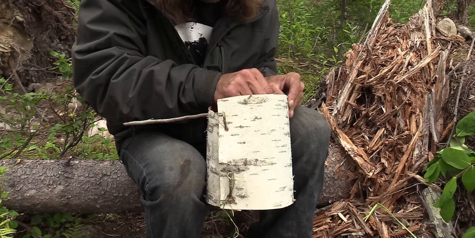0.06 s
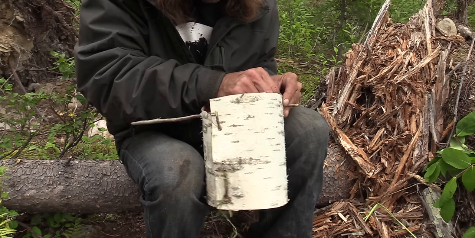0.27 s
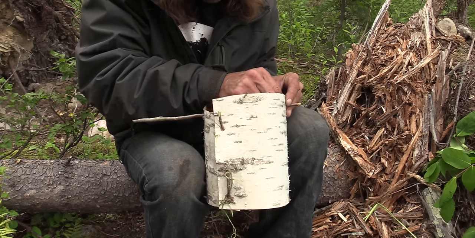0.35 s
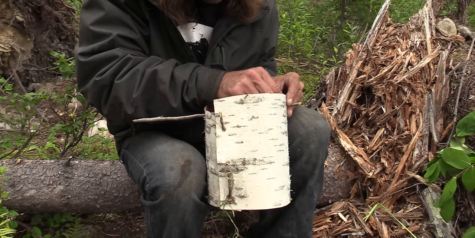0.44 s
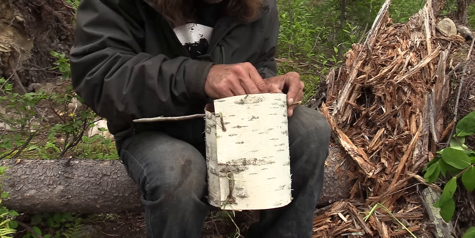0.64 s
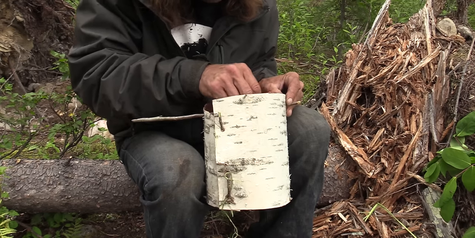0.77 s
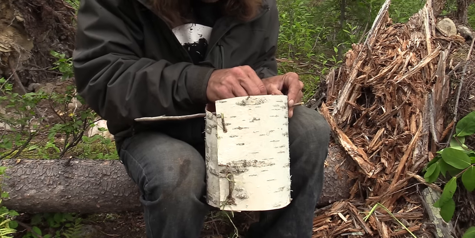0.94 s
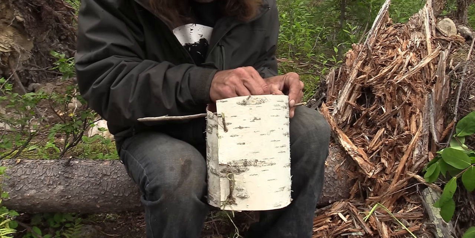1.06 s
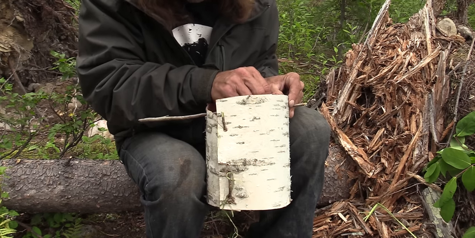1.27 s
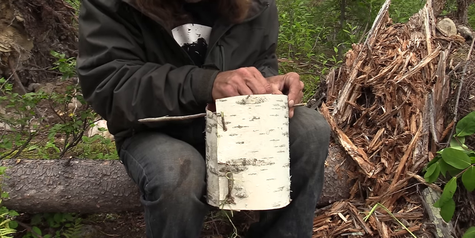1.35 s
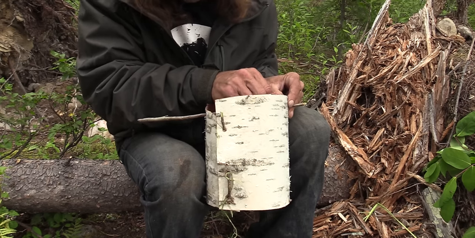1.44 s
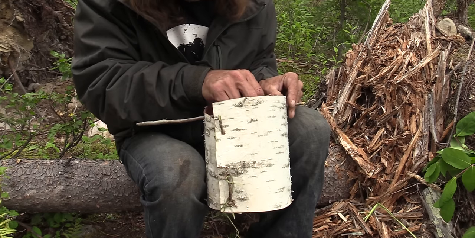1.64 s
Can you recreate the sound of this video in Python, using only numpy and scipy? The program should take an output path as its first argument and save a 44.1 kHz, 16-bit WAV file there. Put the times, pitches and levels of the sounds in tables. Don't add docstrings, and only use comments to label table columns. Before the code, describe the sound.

A dry stick pushes through stiff birch bark, close and dry. Faint rubbing and ticks lead to a loud, bright crackling burst at 0.24-0.29 s, with smaller snaps until 0.35. Soft scraping and faint ticks follow. Hard, hollow snaps come at 0.91, 0.96, 1.08, 1.13-1.15 and 1.26 s, then light clicks and rubbing to 1.7. Quiet forest air, low rumble and hiss lie beneath.

```python
import sys
import numpy as np
from scipy import signal
from scipy.fft import rfft, irfft
from scipy.io import wavfile
from scipy.ndimage import uniform_filter1d

SR = 44100
rng = np.random.default_rng(int(sys.argv[2]) if len(sys.argv) > 2 else 0)


def magnitude_from_level(level_db):
    exponent = np.asarray(level_db, float) / 20
    return 10 ** exponent


def put_to_file(sound):
    columns = np.atleast_2d(sound).T
    safe = np.clip(columns, -1, 1)
    whole_steps = np.round(safe * 32767)
    wavfile.write(sys.argv[1], SR, whole_steps.astype(np.int16))


N = 74970


def level(x, db):
    return x * magnitude_from_level(db) / np.sqrt(np.mean(x ** 2))


def colour(x, points):
    p = np.array(points, float)
    hz = np.maximum(np.arange(len(x) // 2 + 1) * SR / len(x), 1)
    gain_db = np.interp(np.log(hz), np.log(p[:, 0]), p[:, 1])
    return irfft(rfft(x) * magnitude_from_level(gain_db), len(x))


def band(x, hz, width_hz):
    return signal.lfilter(*signal.iirpeak(hz, hz / width_hz, fs=SR), x)


def walk(rate_hz):
    k = int(SR / rate_hz)
    w = uniform_filter1d(uniform_filter1d(rng.standard_normal(N), k), k)
    return (w - w.mean()) / w.std()


def woods():
    # hz, db_per_hz
    air_spectrum = [(20, -37), (45, -8), (100, -1), (190, -4.5), (600, -9), (1000, -15), (2500, -13),
                    (5000, -20.5), (16000, -25)]
    # time_s, gain_db
    low_air = [
        (0.0, -7.7),
        (0.3, 8.5),
        (0.5, 4),
        (0.6, -6.5),
        (0.93, -8),
        (1.02, -1.5),
        (1.4, 3.5),
        (1.7, -3.5),
    ]
    # time_s, level_db
    rumble = [(0.0, -69.5), (0.08, -71), (0.24, -84), (0.268, -65), (0.298, -64), (0.416, -68),
              (0.562, -67), (0.634, -73.5), (1.288, -64), (1.348, -83), (1.534, -61.5), (1.7, -72)]
    # hz, db_per_hz
    hiss_spectrum = [(25, -2), (100, 1), (400, -10.5), (2500, -13), (4000, -9), (9000, -4.5), (16000, -0.5)]
    air_db, drift_db, low_hz = -59, 0.8, 400
    rumble_hz, wander_ratio = 64.6, 0.055
    hiss_db = -69.5

    t = np.arange(N) / SR
    air = colour(rng.standard_normal(N), air_spectrum) * magnitude_from_level(drift_db * walk(13.0))
    air = level(air, air_db)
    low = signal.sosfilt(signal.butter(1, low_hz, fs=SR, output="sos"), air)
    air = air + low * (magnitude_from_level(np.interp(t, *np.array(low_air).T)) - 1)

    phase = 2 * np.pi * np.cumsum(rumble_hz * (1 + wander_ratio * walk(12))) / SR
    far = np.sqrt(2) * np.sin(phase) * magnitude_from_level(np.interp(t, *np.array(rumble).T))
    hiss = level(colour(rng.standard_normal(N), hiss_spectrum), hiss_db)
    return air + far + hiss * np.array([[1], [-1]])


def slide(start_s, end_s, start_db, end_db):
    edge_s = 0.0039
    t = np.arange(N) / SR
    slope = magnitude_from_level(np.interp(t, [start_s, end_s], [start_db, end_db]))
    return slope * np.clip(np.minimum(t - start_s, end_s - t) / edge_s + 0.5, 0, 1)


def scrape():
    # start_s, end_s, start_db, end_db, bright_db
    slides = [(0.0, 0.047, -58, -61, 0), (0.107, 0.208, -72, -66, 1), (0.208, 0.295, -54, -49, 4.5),
              (0.281, 0.307, -23.5, -37.5, -16), (0.302, 0.325, -37.5, -34, -13),
              (0.333, 0.358, -34.5, -40, -12), (0.354, 0.372, -50, -54.5, -2),
              (0.372, 0.484, -51, -63.5, -11), (0.481, 0.601, -53.5, -49, -0.5),
              (0.599, 0.702, -51, -50, -2.5), (0.699, 0.787, -47, -48.5, -1), (0.839, 0.951, -61, -52.5, 0),
              (0.959, 1.008, -34, -50.5, -3), (1.02, 1.04, -51, -53, -15), (1.178, 1.214, -62, -65, -1),
              (1.292, 1.346, -49, -57, -18), (1.347, 1.39, -46, -48, -5), (1.464, 1.53, -58.5, -45, -0.5),
              (1.528, 1.642, -63, -42.5, 2), (1.645, 1.729, -56.5, -46, 7)]
    # start_s, end_s, start_db, end_db
    singing = [
        (0.5, 0.625, -53, -61.5),
        (0.64, 0.696, -63, -65),
        (0.705, 0.802, -62, -58),
        (1.575, 1.72, -60, -62),
    ]
    # hz, width_hz, level_db
    rubbed = [(548, 250, 0.5), (1109, 35, 0.5), (1610, 180, -11.5), (1760, 250, -5), (2480, 100, -1.5),
              (2650, 250, -13.5), (3060, 250, -17)]
    # hz, level_db
    rub_broad = [(150, -30), (330, 1), (480, -1.5), (2000, -8), (3650, -3), (3950, -7.5), (8000, -19.5),
                 (12000, -58)]
    # hz, width_hz, level_db
    edge_modes = [(3250, 200, -4), (3440, 170, 0)]
    grit_per_s, grit_spread_db = 6000, 1.5
    uneven_fast_db, uneven_slow_db, broad_db = 1.2, 1.0, 15.0
    bright_hz = 3460

    hits = rng.random(N) < grit_per_s / SR
    grit = hits * rng.standard_normal(N) * magnitude_from_level(grit_spread_db * rng.exponential(size=N))
    drive = level(grit, 0) + rng.standard_normal(N)
    uneven = magnitude_from_level(uneven_fast_db * walk(62) + uneven_slow_db * walk(18))

    resonant = sum(magnitude_from_level(db) * level(band(drive, hz, w), 0) * np.sqrt(w / 200) for hz, w, db in rubbed)
    broad = colour(drive, rub_broad) * magnitude_from_level(broad_db)
    unit = level((resonant + broad) * uneven, 0)
    top = colour(unit, [(bright_hz / 2, -24), (bright_hz, -6), (bright_hz * 2, 0)])
    rub = sum(slide(*stroke) * (unit + (magnitude_from_level(bright_db) - 1) * top) for *stroke, bright_db in slides)

    edge = sum(magnitude_from_level(db) * band(band(drive, hz, w), hz, 2 * w) for hz, w, db in edge_modes)
    edge = level(uneven * edge, 0)
    return rub + edge * sum(slide(*stroke) for stroke in singing)


def thuds():
    # start_s, peak_db, pitch_hz, t60_s
    bumps = [(0.008, -44, 320, 0.06), (.1955, -30, 870, 0.012), (0.272, -22, 1150, 0.02),
             (0.278, -38, 90, 0.15), (0.325, -40, 110, 0.1), (0.33, -41, 172, 0.1), (0.335, -39, 340, 0.07),
             (0.4715, -38, 660, 0.022), (0.9592, -17, 2400, 0.012), (0.9617, -14, 2150, 0.012),
             (0.961, -26, 1120, 0.02), (1.0268, -33, 1060, 0.015), (1.0775, -18, 2050, 0.012),
             (1.0795, -23, 1085, 0.02), (1.152, -32, 360, 0.04), (1.2572, -14, 2050, 0.02),
             (1.2825, -36, 1750, 0.014), (1.3325, -32, 1750, 0.014), (1.4205, -36, 1800, 0.014),
             (1.483, -41, 330, 0.05), (1.4825, -31, 1900, 0.014), (1.6247, -30, 1780, 0.015),
             (1.6247, -26, 4000, 0.011), (1.673, -38, 3300, 0.01)]
    rise_cycles = 0.29
    t, out = np.arange(N) / SR, np.zeros(N)
    for start_s, db, hz, t60_s in bumps:
        age = np.maximum(t - start_s, 0)
        swell = 1 - np.exp(-age * hz / rise_cycles)
        out += magnitude_from_level(db - 60 * age / t60_s) * swell * np.sin(2 * np.pi * hz * age)
    return out


def tilt(hz, bright_db):
    pivot_hz, span_octaves = 2270, 1.05
    return bright_db * np.clip(np.log2(hz / pivot_hz) / span_octaves, -1, 1.3)


def ring(modes, t, chance):
    detune_ratio, scatter_db = 0.038, 3
    m = np.array(modes, float)
    hz = m[:, 0] * (1 + detune_ratio * chance[:, 0])
    db = m[:, 1] + scatter_db * chance[:, 1]
    tones = np.sin(2 * np.pi * hz[:, None] * t) * magnitude_from_level(-60 * t / m[:, 2:])
    return np.sum(magnitude_from_level(db)[:, None] * tones, axis=0)


def release(events, late_s, burst_s, hollow_late_s, pitch):
    # hz, level_db, t60_s
    wall_modes = [(950, 1.5, 0.0039), (1275, -1.5, 0.011), (1815, -11, 0.014), (1958, 7.5, 0.015),
                  (2450, 10, 0.0077), (2540, 3.5, 0.035), (3044, -1.5, 0.012), (3070, -0.5, 0.0098),
                  (4550, -16, 0.009), (4140, -1.5, 0.0095), (4600, -15, 0.0016), (5210, -1.5, 0.013),
                  (6100, -27, 0.01), (7340, -39, 0.014)]
    # hz, level_db, t60_s
    hollow_modes = [(343.4, -17, 0.057), (531.9, 1.5, 0.037), (581.4, -5.5, 0.047), (683, -4, 0.017),
                    (824, -8.5, 0.021)]
    # hz, level_db, t60_s
    rustle_bands = [(1148, -14.5, 0.02), (1695, -5, 0.032), (2685, 4.5, 0.017), (3710, -7, 0.021),
                    (5720, -25.5, 0.013), (7630, -10, 0.0088), (10200, -23.5, 0.0056), (13020, -11, 0.0095)]
    # time_s, wall_pitch_ratio, hollow_pitch_ratio
    grip_points = [(0.2, 0.84, 1.05), (0.25, 0.96, 1.15), (0.285, 0.988, 1.097), (0.34, 0.96, 0.96),
                   (0.915, 1.05, 1.1), (0.96, 0.92, 1.043), (1.08, 1.024, 1.05), (1.15, 0.963, 1.008),
                   (1.26, 0.94, 1.01), (1.48, 1.09, 0.88), (1.62, 0.92, 0.94)]
    n, burst_count = 4096, 9
    snap_db, rustle_db, hollow_gain_db = -0.5, 1.0, -9
    hollow_rise_s, rustle_rise_cycles, hold_hz = 0.0022, 1, 2670

    out, t = np.zeros(N + n), np.arange(n) / SR
    late = np.maximum(t - hollow_late_s, 0)
    r, w = np.array(rustle_bands), np.array(wall_modes, float)
    grip = np.array(grip_points).T
    noise = rng.standard_normal(N + n)
    bands = np.array([level(band(band(noise, hz, hz / 2), hz, hz / 2), db) for hz, db, _ in rustle_bands])
    hold_s = burst_s * np.minimum(hold_hz / r[:, :1], 1)
    fade = magnitude_from_level(-60 * np.maximum(t - hold_s, 0) / r[:, 2:])
    fade = fade * (1 - np.exp(-t * r[:, :1] / rustle_rise_cycles))

    for start_s, db, hollow_db, bright_db in events:
        chance = rng.standard_normal((len(w) + len(hollow_modes), 2))
        wall_pitch, hollow_pitch = (np.interp(start_s, grip[0], ratio) for ratio in grip[1:])
        i = int((start_s + late_s) * SR)

        when, size, sign = rng.random((3, burst_count))
        at = (burst_s * SR * when * (np.arange(burst_count) > 0)).astype(int)
        burst = np.bincount(at, (0.8 + size + (at == 0)) * np.sign(sign - 0.5))

        modes = w * [wall_pitch, 1, 1] + np.outer(tilt(w[:, 0], bright_db), [0, 1, 0])
        wall = signal.fftconvolve(ring(modes, t, chance[:len(w)]), burst)[:n]
        rustle = magnitude_from_level(tilt(r[:, 0], bright_db)) @ (fade * bands[:, i:i + n])
        wall = wall / np.linalg.norm(wall) + magnitude_from_level(rustle_db) * rustle / np.linalg.norm(rustle)
        wall = wall * 4.67 / np.linalg.norm(wall)

        hollow = ring(hollow_modes, late * pitch * hollow_pitch, chance[len(w):] / 2)
        hollow = hollow * (1 - np.exp(-late / hollow_rise_s))
        out[i:i + n] += magnitude_from_level(db + snap_db) * (wall + magnitude_from_level(hollow_gain_db + hollow_db) * hollow)
    return signal.sosfilt(signal.butter(2, 180, "high", fs=SR, output="sos"), out[:N])


def ticks():
    # start_s, peak_db, hollow_db, bright_db
    catches = [(0.013, -50, -4, 3), (0.042, -38, -5.5, 18.5), (0.161, -38, 4, 35), (0.165, -42, -1, -23),
               (0.397, -53.5, 18.5, 0), (0.45, -39, 10, -28), (0.471, -38, 12, -24),
               (0.705, -43.5, 14, -22), (0.735, -31, 3, -34), (0.805, -50, 15, -6), (0.864, -37, 0.5, -15),
               (0.875, -40.5, 9, 3), (1.282, -31.5, -23, -15), (1.313, -34.5, -3, -13),
               (1.331, -30, 6.5, -5.5), (1.353, -32, 6, -24), (1.37, -41.5, 12.5, -24),
               (1.383, -47, 12, -11), (1.419, -34.5, 6.5, -13), (1.432, -48, 7, -1), (1.455, -52, 13, -4),
               (1.481, -26, -0.5, -8.5), (1.493, -33.5, 2, 3), (1.514, -31, 3, -2), (1.524, -46, 9, -25),
               (1.553, -36, 11.5, -10), (1.589, -45.5, 14.5, -11), (1.612, -47, 19, 3),
               (1.623, -28.5, -4.5, -18), (1.673, -34, -20, 7)]
    light = release(catches, late_s=0.0008, burst_s=0.001187, hollow_late_s=0.0019, pitch=1.065)
    return colour(light, [(3700, 1.03), (4600, -1.8)])


def snaps():
    # start_s, peak_db, hollow_db, bright_db
    snags = [(0.195, -35.5, 15, -17), (0.213, -34, 5, 14), (0.231, -29, -9, 12), (0.243, -13, 5, 10.5),
             (0.253, -6, 1, 8.5), (0.268, -2.5, 4, 4), (0.272, -8, -18, -27.5), (0.28, -14, 12, -8),
             (0.287, -24, 0.5, 0), (0.317, -21, -5, -26), (0.331, -16, 0, -0.5), (0.344, -20.5, -4, -10),
             (0.348, -26.5, -1.5, -22), (0.89, -33, 0, -2), (0.9, -27.5, 2, -3), (0.911, -18.5, -23, 0),
             (0.915, -14, 3.5, -12.5), (0.958, -8.5, 1.5, -13.5), (1.026, -33, 6, -24),
             (1.077, -8, 1.5, -8), (1.132, -15, -6, -5), (1.139, -13.5, 4, -2), (1.147, -31.5, -4, -12),
             (1.15, -8.5, 2, 4.5), (1.246, -41, 15, 9), (1.256, -9, 3, 6)]
    return release(snags, late_s=0.0007, burst_s=0.0036, hollow_late_s=0.003286, pitch=0.94)


def cracks():
    # start_s, peak_db
    breaks = [(0.2128, -33), (0.2443, -14), (0.2545, -11), (0.2688, -2), (0.331, -47), (0.9143, -33),
              (0.9597, -14), (1.0778, -16), (1.1333, -34), (1.151, -19.5), (1.2571, -24), (1.6247, -34)]
    crack_hz, t60_s = 5270, 0.001
    t, pulls = np.arange(256) / SR, np.zeros(N)
    start_s, db = np.array(breaks).T
    pulls[(start_s * SR).astype(int)] = -magnitude_from_level(db)
    pulse = np.cos(2 * np.pi * crack_hz * t) * magnitude_from_level(-60 * t / t60_s)
    return signal.fftconvolve(pulls, pulse)[:N]


def scene():
    return woods() + scrape() + thuds() + ticks() + snaps() + cracks()


def band_limit(x):
    return signal.sosfilt(signal.butter(12, 17480, fs=SR, output="sos"), x)


def record(dry):
    top_hz = 16140
    mix = signal.sosfilt(signal.ellip(8, 0.3, 36, top_hz, fs=SR, output="sos"), dry)
    return band_limit(mix)


dry = scene()
out = record(dry)
put_to_file(out)
```